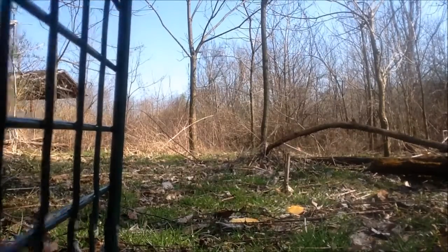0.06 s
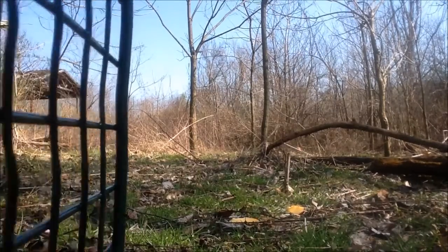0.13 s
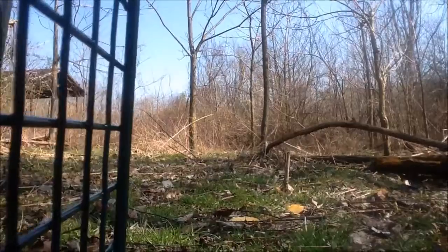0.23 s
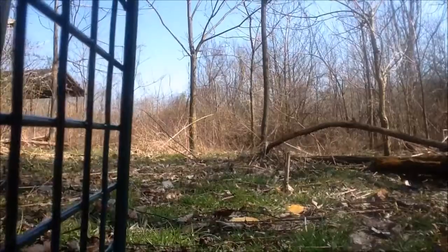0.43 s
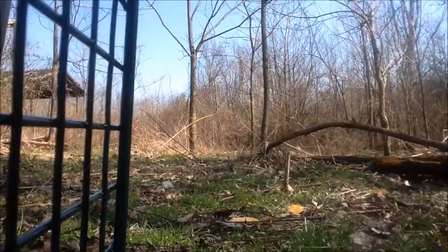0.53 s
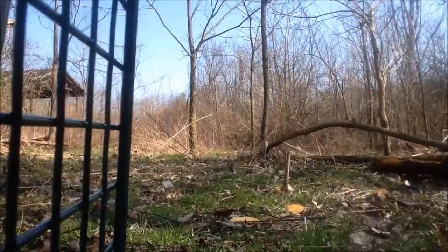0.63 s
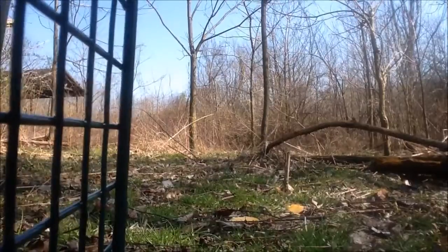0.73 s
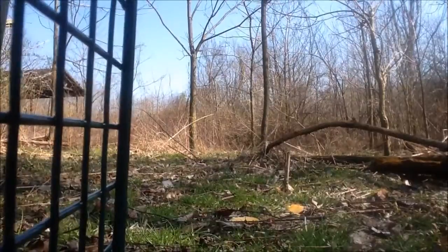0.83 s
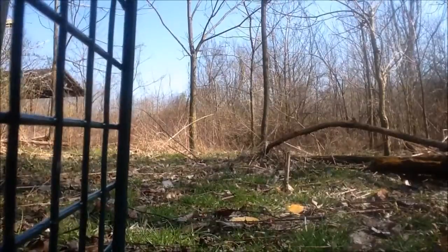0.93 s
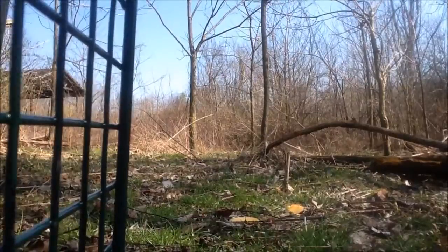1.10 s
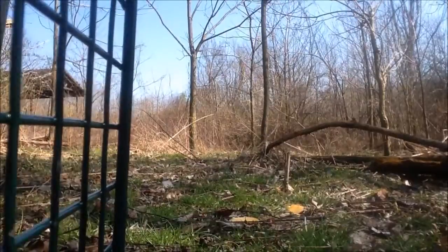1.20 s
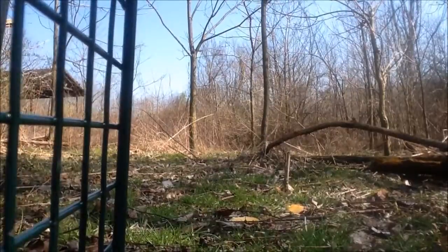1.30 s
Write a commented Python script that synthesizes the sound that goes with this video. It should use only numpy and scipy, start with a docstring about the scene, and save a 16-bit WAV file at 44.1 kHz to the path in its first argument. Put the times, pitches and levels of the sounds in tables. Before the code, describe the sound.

Very close, dry outdoor sound of a sheet-metal door crashing shut on a wire cage, a jangling burst that quickly fades, then light clinks and near quiet, with a small bird chirping faintly and low rumble.

```python
"""A bare wood, with the microphone right beside a wire cage trap as its sheet-metal door slides, slams and bounces.
Each contact is a fading chatter of tiny knocks that rings the dense wire mesh, made of decaying noise bands.
Door panel and loose latch rod add clearer modes, as ringing resonators.
A small bird gives two upward chirps, gliding sines with a faint echo, over noise for distant rumble and soft hiss."""
import sys
import numpy as np
from scipy import signal
from scipy.io import wavfile

SR = 44100
rng = np.random.default_rng(int(sys.argv[2]) if len(sys.argv) > 2 else 0)


def file_out(sig):
    """Save sig as 16-bit WAV at sys.argv[1]."""
    # one column per channel
    cols = np.atleast_2d(sig).T
    # limit, then scale
    lim = np.clip(cols, -1, 1)
    pcm = np.round(lim * 32767).astype(np.int16)
    wavfile.write(sys.argv[1], SR, pcm)


def gain_from_db(level_db):
    """Convert decibel levels to linear amplitude factors (20 dB per decade)."""
    decades = np.asarray(level_db, float) / 20
    return 10 ** decades


N = 59535  # length in samples
SPOTS = 6  # places on the mesh where knocks land


def rms_one(x):
    """Scale to rms 1."""
    return x / np.sqrt(np.mean(x ** 2) + 1e-20)


def in_time(rows):
    """Columns of a table joined by straight lines in time."""
    s, *columns = np.transpose(rows)
    return [np.interp(np.arange(N) / SR, s, c) for c in columns]


def at_hz(points, hz):
    """Read a table on a log-frequency axis."""
    table_hz, values = np.transpose(points)
    return np.interp(np.log(hz), np.log(table_hz), values)


def cut(x, hz, kind, order=2):
    """Butterworth filter."""
    return signal.sosfilt(signal.butter(order, hz, kind, fs=SR, output="sos"), x)


def drift(rate_hz):
    """Slow random wander of rms 1: noise through two equal low-pass poles."""
    step = 40  # samples between computed points
    pole = np.exp(-2 * np.pi * rate_hz * step / SR)
    noise = rng.standard_normal(N // step + 2002)
    slow = signal.lfilter([1], [1, -2 * pole, pole * pole], noise)[2000:]  # settled part only
    return np.interp(np.arange(N) / step, np.arange(len(slow)), rms_one(slow))


def bands(spectrum):
    """Half-octave noise bands at the level of a spectrum: (centre Hz, noise)."""
    edges = 35 * 2 ** np.arange(0, 9.1, .5)
    white = rng.standard_normal((2, N + 4000))  # neighbouring bands take turns
    parts = []
    for k, (lo, hi) in enumerate(zip(edges, edges[1:])):
        centre = np.sqrt(lo * hi)
        noise = cut(white[k % 2], [lo, hi], "band")[-N:]
        parts.append((centre, gain_from_db(at_hz(spectrum, centre)) * noise))
    return parts


def knocks(per_s):
    """Tiny knocks at random times, of uneven size and either sign; rms 1."""
    spread_db = 4.5
    sizes = gain_from_db(spread_db * np.minimum(rng.exponential(1, N), 4)) * rng.choice([-1, 1], N)
    return rms_one(sizes * (rng.random(N) < per_s / SR))


def three_tone(x, hard, middle, dull):
    """Hard contact drives the treble, dull contact the bass: three ranges, each with its own level."""
    dull_below_hz, hard_above_hz = 1125, 5030
    treble = cut(x * hard, hard_above_hz, "high")
    bass = cut(x * dull, dull_below_hz, "low")
    return treble + bass + cut(x * middle, [dull_below_hz, hard_above_hz], "band", order=1)


def forces():
    """The force on the mesh, one row for each spot: fading chatter at each contact, plus the slide."""
    # Contacts of door and cage. Each row: start in seconds, time for the chatter to fade 20 dB in seconds,
    # then the levels of the hard, middle and dull parts in dB.
    contacts = [(0.107, 0.0252, -68, -33, -28), (0.166, 0.21, -49, -37.5, -59),
                (0.201, 0.2325, -32, -30.5, -27.5), (0.2216, 0.0219, -7, -8, -17),
                (0.234, 0.0365, -2.5, -5, -10.5), (0.254, 0.0333, -7, -7, -21),
                (.27, 0.08, -12.5, -15.5, -21), (0.288, 0.1, -29, -20.5, -25.5),
                (0.316, 0.0574, -18, -42, -33), (0.347, 0.1474, -26, -23, -32.5),
                (0.5152, 0.0556, -26.5, -27, -31.5), (0.652, 0.14, -65, -46, -56),
                (1.287, 0.1452, -49, -47.5, -47.5)]
    # The door scrapes in its guides. Each row: time in seconds, hard, middle and dull parts in dB.
    slide_path = [(.035, -72, -54.5, -71), (.06, -41, -39, -50), (.08, -35, -40, -46),
                  (.1, -42.5, -36, -39.5), (.12, -65, -47.5, -58), (.135, -77, -75, -75)]
    first_knock_db = 10  # one firm knock opens each contact, above the rms of the chatter
    t = np.arange(N) / SR
    power = np.zeros((3, N))
    chatter = knocks(3000)
    for s, fade, hard_db, middle_db, dull_db in contacts:
        envelope = (t >= s) * gain_from_db(-20 * np.abs(t - s) / fade)
        power = power + np.outer(gain_from_db([hard_db, middle_db, dull_db]), envelope) ** 2
        chatter[int(s * SR) + 1] = gain_from_db(first_knock_db)
    scrape = knocks(9000)
    slide = gain_from_db(in_time(slide_path))
    spot = rng.integers(0, SPOTS, N)  # where each knock lands
    rows = []
    for k in range(SPOTS):
        contact_force = three_tone(chatter * (spot == k), *np.sqrt(power))
        rows.append(contact_force + three_tone(scrape * (spot == k), *slide))
    return rows


def mesh(rows):
    """Countless close modes: each spot answers with its own noise that dies band by band."""
    # Colour of the ringing wire. Each row: frequency in Hz, relative density in dB per Hz.
    wire_colour = [(35, -58), (60, -27), (123, -5), (320, -6), (792, -7.5), (1020, -8), (2250, -15.5),
                   (3930, -6.5), (7720, -14.5), (14500, -13), (15500, -11)]
    # How long the wire rings. Each row: frequency in Hz, time to fall 60 dB in seconds.
    wire_t60 = [(100, 0.4), (300, 0.35), (1000, 0.22), (3000, 0.19), (6000, 0.17), (14000, 0.13)]
    crack_db, crack_t60_s = 1.5, 0.03  # short crack at the head of each knock
    t = np.arange(N // 2) / SR
    parts = bands(wire_colour)
    out = 0
    for k, force in enumerate(rows):
        answer = 0
        for hz, noise in parts:
            own_noise = np.roll(noise, -k * N // SPOTS)[:N // 2]
            answer = answer + own_noise * gain_from_db(-60 * t / at_hz(wire_t60, hz))
        answer = answer * (1 + gain_from_db(crack_db - 60 * t / crack_t60_s))
        answer = answer / np.sqrt(np.sum(answer ** 2))  # energy 1
        out = out + signal.fftconvolve(force, answer)[:N]
    return out


def struck(modes, blows):
    """Each blow sets every mode ringing with a strength of its own; loose parts make each ring waver."""
    mode_spread_db, split_hz = 1.5, 1200  # split: between low and high modes
    wobble_db, wobble_hz = 2.5, 20  # depth reached from split_hz up, less below
    s, low_db, high_db = np.transpose(blows)
    chance_db = mode_spread_db * rng.standard_normal((len(s), len(modes)))
    out = 0
    for k, (hz, level_db, t60) in enumerate(modes):
        blow_db = low_db if hz < split_hz else high_db
        clicks = np.full(N, 1e-18)  # tiny floor instead of zeros
        clicks[(s * SR).astype(int)] = gain_from_db(level_db + blow_db + chance_db[:, k]) * (-1) ** k
        r, w = gain_from_db(-60 / (t60 * SR)), 2 * np.pi * hz / SR  # decay and turn per sample
        ring = signal.lfilter([0, np.sin(w)], [1, -2 * r * np.cos(w), r * r], clicks)
        waver = gain_from_db(wobble_db * np.minimum(hz / split_hz, 1) * drift(wobble_hz))
        out = out + waver * ring
    return out


def door():
    """The sheet-metal panel rings in long, separate modes when knocked."""
    # Panel modes. Each row: frequency in Hz, relative level in dB, time to fall 60 dB in seconds.
    panel_modes = [(290, -6, .45), (313, -11, .65), (445, -10, .6), (483, 0, .55), (695, -10, .6),
                   (2040, -16, .4), (2916, -15, .5), (3252, -13, .4), (3535, -1, .25), (3566, -1, .26),
                   (4983, -5, .3), (5512, -8, .26), (5884, -7, .2), (6106, -7, .26), (9970, -8, .18),
                   (10250, -8, .18), (10650, -8, .18)]
    # Knocks on the panel. Each row: start in seconds, level of low modes in dB, level of high modes in dB.
    panel_knocks = [(.262, -23.5, -42.5), (.296, -46, -24), (.5175, -44, -51)]
    return struck(panel_modes, panel_knocks)


def latch_rod():
    """The loose latch rod clinks in modes of its own."""
    # Rod modes. Each row: frequency in Hz, relative level in dB, time to fall 60 dB in seconds.
    rod_modes = [(580, -4, .1), (720, -3, .09), (990, -7, .5), (1130, -2, .2), (3160, -3, .25),
                 (3240, -4, .2), (3560, -3, .25), (3950, -1, .33), (4315, -2, .18), (4365, -3, .18),
                 (4587, -11, .2), (4985, -11, .2)]
    # Clinks of the rod. Each row: start in seconds, level of low modes in dB, level of high modes in dB.
    clinks = [(.104, -48, -73), (0.166, -80, -48.5), (.518, -39, -49), (.555, -65.5, -48),
              (0.641, -58, -54), (0.653, -53.5, -46.5)]
    return struck(rod_modes, clinks)


def bird():
    """Upward whistles, sines gliding along one pattern, with a faint echo off the trees."""
    # One chirp. Each row: seconds after its start, pitch in Hz, relative level in dB.
    whistle = [(0, 1786, -17), (.016, 1970, -14), (0.028, 2270, -10), (.034, 2620, -2), (.041, 3020, -2),
               (0.049, 3064, 0), (0.055, 2790, -6), (.068, 2600, -20)]
    # The chirps heard. Each row: start in seconds, level in dB, pitch factor.
    calls = [(.086, -40.5, .99), (0.798, -50, 1.04)]
    echo_s, echo_db = 0.018, -18
    t = np.arange(N) / SR
    s, hz, db = np.transpose(whistle)
    out = 0
    for start, level_db, factor in calls:
        pitch = factor * np.interp(t - start, s, hz) * (1 + 0.0077 * drift(70))
        on = (t > start) & (t < start + s[-1])
        loudness = gain_from_db(level_db + np.interp(t - start, s, db) + 1.5 * drift(80))
        tone = np.sqrt(2) * np.sin(2 * np.pi * np.cumsum(pitch) / SR)  # rms 1
        out = out + on * loudness * tone
    return out + gain_from_db(echo_db) * np.roll(out, int(echo_s * SR))


def background():
    """Slightly lumpy low rumble and smoother hiss: noise bands that drift, each group on its own level."""
    # Colour of rumble and hiss. Each row: frequency in Hz, relative density in dB per Hz.
    air_colour = [(30, -26), (60, -10), (110, -2.5), (180, 3), (280, -1), (380, -13), (550, -5),
                  (1000, -13), (2500, -10.5), (5000, -18.5), (9000, -16), (15500, -17)]
    # Their course. Each row: time in seconds, rumble level in dB, hiss level in dB.
    air_levels = [(0, -49.5, -59), (.05, -53, -57), (.2, -46, -52.5), (.7, -61.5, -56.5), (.85, -60, -57),
                  (1.15, -59.5, -56), (1.35, -54, -51.5)]
    rumble_below_hz = 500
    rumble_db, hiss_db = in_time(air_levels)
    parts = bands(air_colour)
    rumble = sum(b * gain_from_db(2.0 * drift(20)) for hz, b in parts if hz < rumble_below_hz)
    hiss = sum(b * gain_from_db(1.2 * drift(12)) for hz, b in parts if hz >= rumble_below_hz)
    return gain_from_db(rumble_db) * rms_one(rumble) + gain_from_db(hiss_db) * rms_one(hiss)


def scene():
    """One microphone feeds both channels."""
    trap = mesh(forces()) + door() + latch_rod()
    return np.tile(trap + bird() + background(), (2, 1))


def band_limit(x):
    """A steep low-pass at the top of the band."""
    return signal.sosfilt(signal.butter(12, 16450, fs=SR, output="sos"), x)


def record(dry):
    """The microphone drops the deep bass and rounds the peaks, then a steep filter cuts the top."""
    low_cut_hz, top_cut_hz, overload_top = 129, 15750, .9
    heard = overload_top * np.tanh(cut(dry, low_cut_hz, "high") / overload_top)
    top_cut = signal.cheby2(16, 60, top_cut_hz, fs=SR, output="sos")
    return band_limit(signal.sosfilt(top_cut, heard))


dry = scene()
out = record(dry)
file_out(out)
```